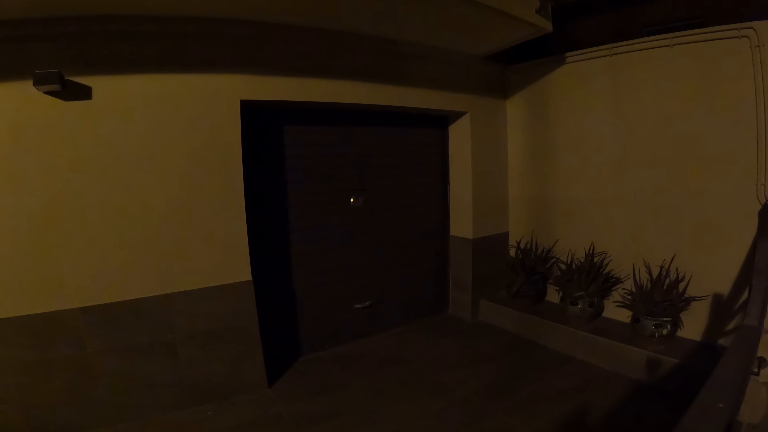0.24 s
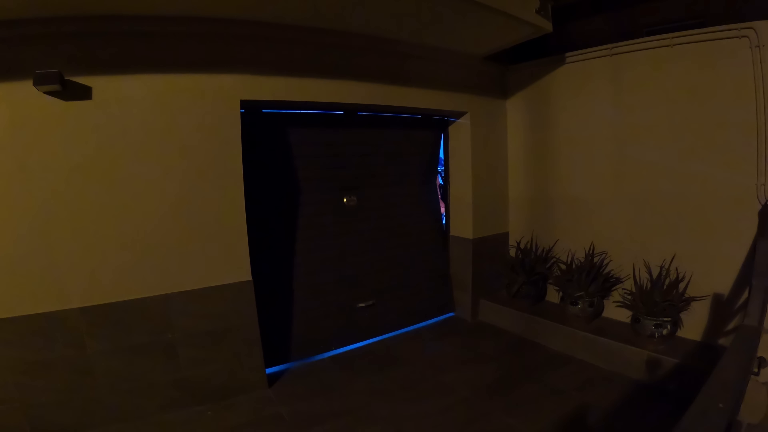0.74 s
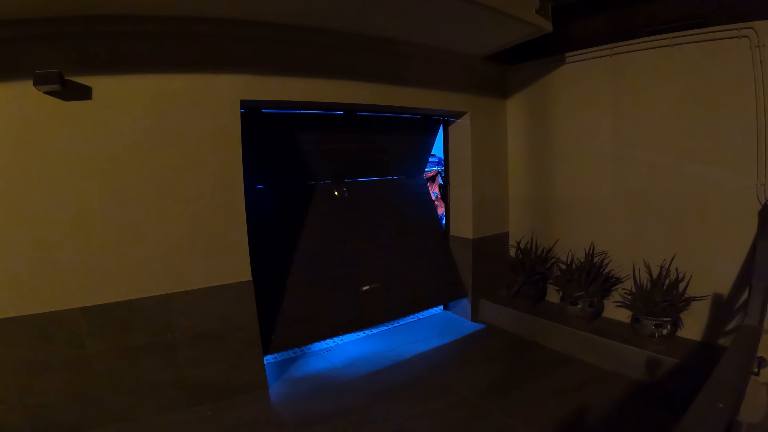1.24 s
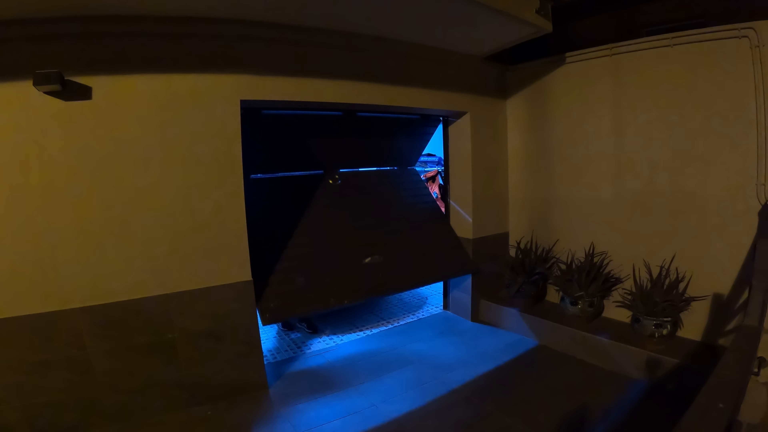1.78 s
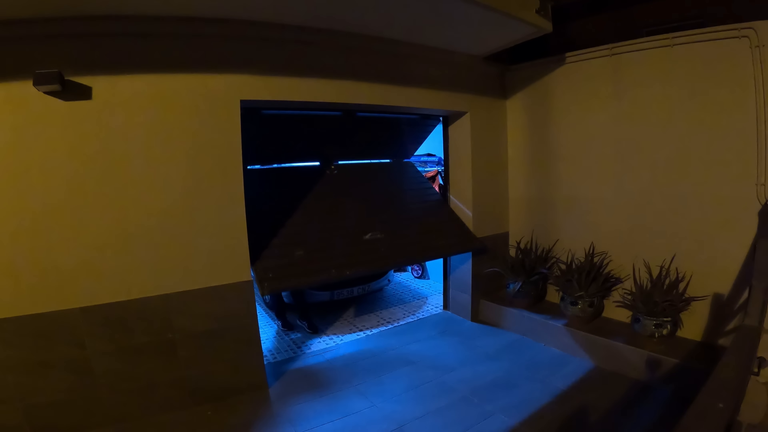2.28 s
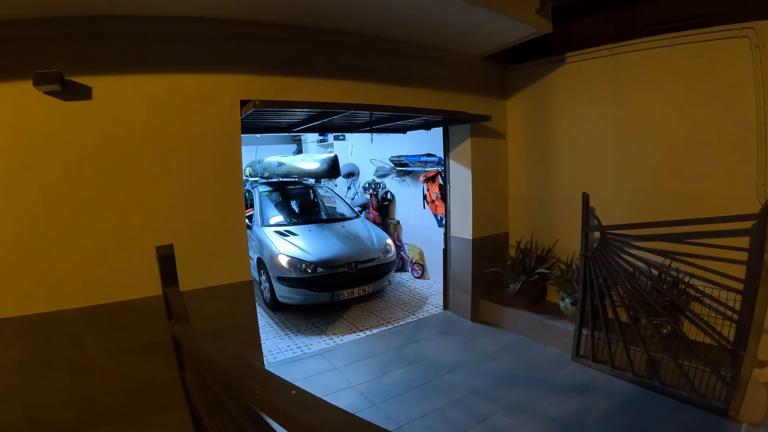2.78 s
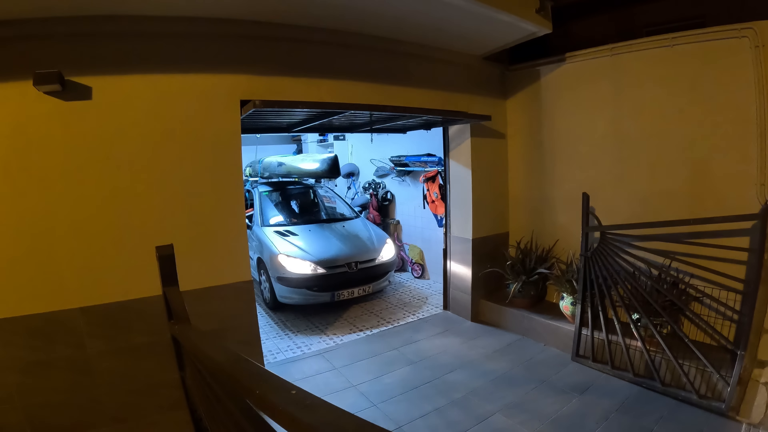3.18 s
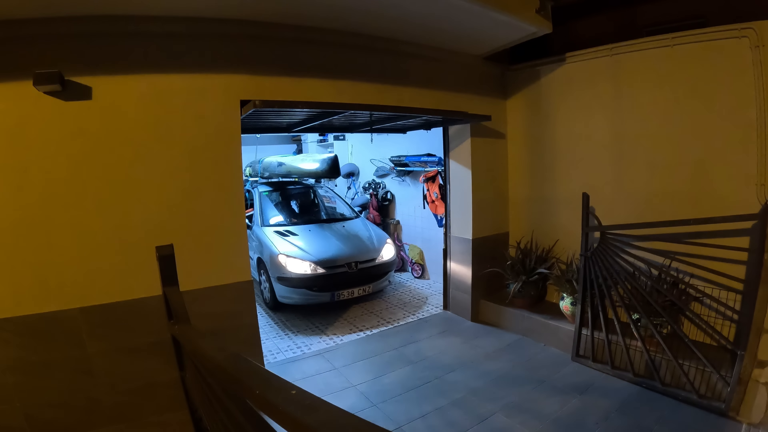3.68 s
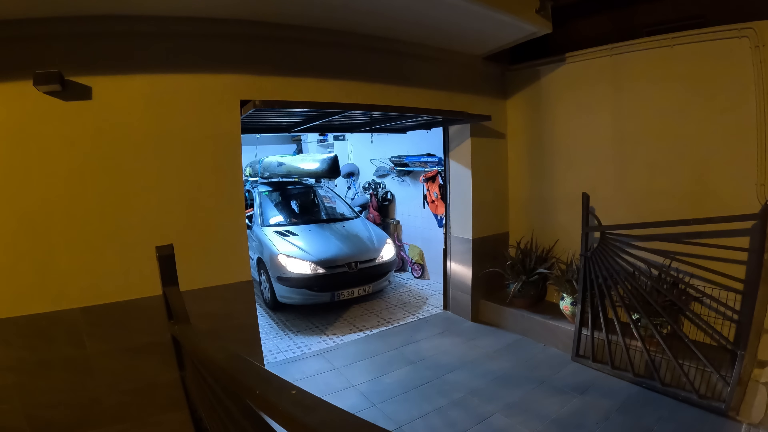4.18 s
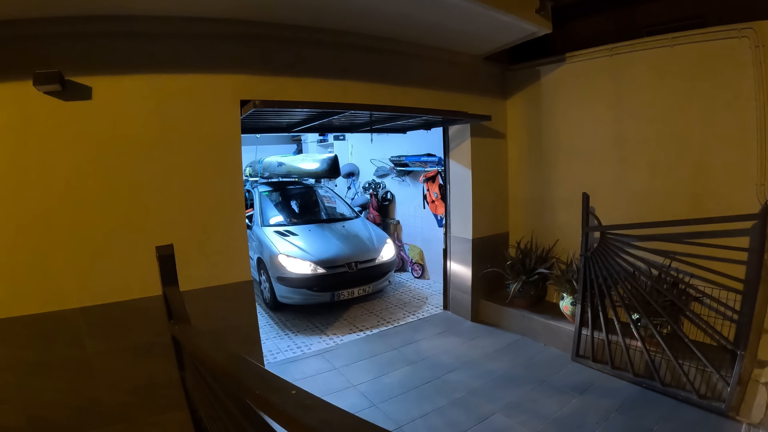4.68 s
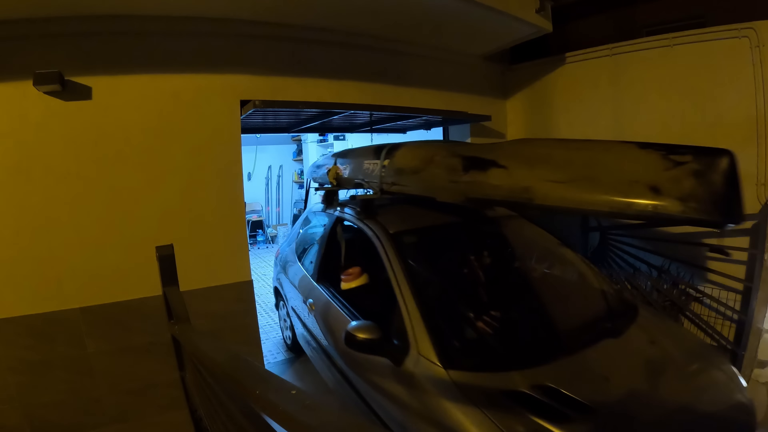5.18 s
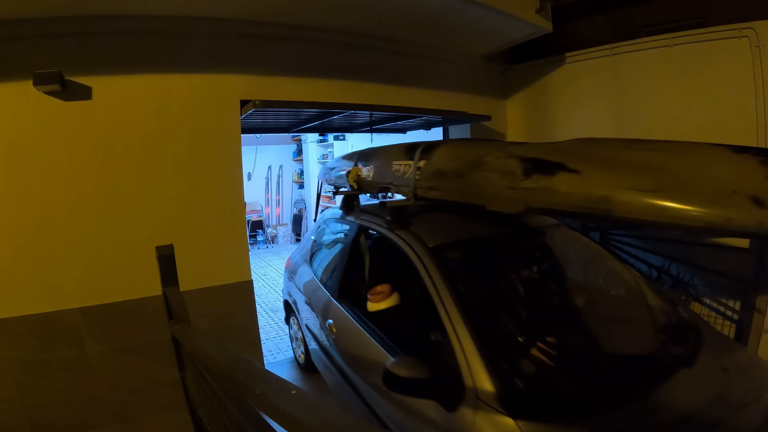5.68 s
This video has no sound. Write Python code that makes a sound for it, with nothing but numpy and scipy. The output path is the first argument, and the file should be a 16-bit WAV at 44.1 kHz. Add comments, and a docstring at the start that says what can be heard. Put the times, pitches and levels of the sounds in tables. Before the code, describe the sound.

From the start, a steel garage door is unlatched with quick clattering blows and a light scrape. Around 0.45 s it jolts free with a deep panel boom and shudder. More clanks follow, with a strong rattle at 0.95 s, a short piercing squeal near 1.06 s sliding into thinner squeaks until about 1.3 s, and the loudest bang at 1.4 s. Uneven rolling, knocks and a low drone continue, echoing off hard walls, until an abrupt cut at 2.78 s. Then a very quiet street: faint low town murmur and tiny rustles. At 3.65 s a starter slams in, grinding and whining, labouring near 4.0 and 4.17 s. The engine catches around 4.25 s, barks and flares at 4.35-4.5 s as the starter releases. From about 4.9 s the small four-cylinder car is closer and fuller, idling steadily with low throbbing, ticking, humming and occasional clacks to the end.

```python
"""A steel garage door clatters as it is unlatched and hauled up; its panels boom and its pivots squeal.
The door noise cuts off abruptly into a quiet night street. A small four-cylinder car is cranked in the garage,
catches, flares, then idles outside, close by. Bursts of noise make the blows and grinding, fading tones make
the ringing metal, gliding tones make the squeals, and a turning engine phase times every firing. Walls echo."""
import sys
import numpy as np
from scipy import signal
from scipy.fft import rfft, irfft, next_fast_len
from scipy.io import wavfile

SR = 44100
rng = np.random.default_rng(int(sys.argv[2]) if len(sys.argv) > 2 else 0)


def store_pcm(level_fs):
    """Save levels as 16-bit WAV."""
    pcm = np.round(np.clip(level_fs, -1, 1) * 32767).astype(np.int16)
    wavfile.write(sys.argv[1], SR, np.atleast_2d(pcm).T)


N = 261954
T = np.arange(N) / SR
PADDED = next_fast_len(N + SR)
FREQS = np.fft.rfftfreq(PADDED, 1 / SR)

# Levels are relative: spectra, echoes and mixing shape them further.
# t60_s is the time a ringing tone takes to fall by 60 dB; half_width_s is where a bump falls to 1/e.

# Door blows: start_s, level_db, brightness_db_per_octave
DOOR_BLOWS = [(0.017, -38.5, 3), (.038, -27.5, 0.5), (.084, -31, -0.5), (.163, -33, 1.5),
              (0.217, -32, -0.5), (0.456, -41, 1), (.486, -28, -0.5), (.592, -46, 2), (.642, -34.5, -3),
              (.728, -42, 2), (0.75, -45, 2), (0.798, -44.5, 4.5), (0.92, -37, 3.5), (0.948, -23, 2),
              (.994, -24.5, 5), (1.39, -38.5, 2), (1.408, -18, 2), (1.442, -27, 0), (1.503, -31, 4),
              (1.644, -43.5, 3.5), (1.772, -25.5, 1.5), (1.865, -40.5, 4), (1.981, -31.5, 3),
              (2.039, -31.5, -0.5), (2.122, -28, 2), (2.184, -29, 2), (2.264, -34, 1), (2.385, -40.5, -3.5),
              (2.482, -52.5, 2), (2.596, -34, -3), (2.714, -31.5, 0), (2.755, -39, 0.5)]
# Colour of the clattering door: frequency_hz, level_db
DOOR_COLOUR = [(88, -21), (150, -10.5), (337, -1.5), (401, 1), (772, -9), (1130, -4.5), (1910, -9),
               (2270, -12), (3400, -15), (4720, -21), (6550, -20), (7940, -34), (12100, -45.5),
               (15000, -67)]
# Ringing tones of the sheet steel: pitch_hz, level_db, t60_s
STEEL_TONES = [(398, -26.5, 0.16), (420, -25, 0.75), (530, -21, 0.93), (639, -16.5, 0.074), (800, -29, .3),
               (948, -21, 0.39), (1057, -29, 0.94), (1183, -15.5, 0.23), (1372, -14.5, 0.077),
               (1627, -24.5, 0.53), (2320, -23, 0.47), (3120, -30.5, 0.28), (4200, -20.5, .25),
               (4160, -17, .35)]
# Rollers in their tracks: time_s, level_db
ROLLING = [(.4, -62), (.5, -34.5), (.7, -52), (1.25, -43.5), (1.52, -38.5), (1.7, -44), (1.85, -34.5),
           (2.3, -39), (2.57, -45), (2.78, -39)]
# Colour of grit in the tracks: frequency_hz, level_db
TRACK_COLOUR = [(80, -10.5), (150, -2), (205, -6.5), (300, -4.5), (450, -6), (730, -10.5), (1080, -10.5),
                (1400, -11.5), (2640, -28.5), (3300, -24.5), (4400, -33), (6700, -30.5), (7600, -45.5),
                (14000, -60)]
# Colour of the shuddering leaf: frequency_hz, level_db
SHUDDER_COLOUR = [(15, -25), (40, 6), (70, -1), (120, -5), (170, -25.5), (400, -37), (2000, -76)]
# The folded leaf drones as it nears the top: time_s, level_db
DRONE_LEVELS = [(.4, -77), (1.7, -90), (2.2, -47.5), (2.55, -46), (2.78, -37.5)]
# Colour of that drone: frequency_hz, level_db
LEAF_COLOUR = [(110, -26), (150, 6), (172, -9.5), (215, -33.5), (400, -52.5), (2000, -81)]
# Pings of the bolt and lifting arms: start_s, pitch_hz, level_db, t60_s
METAL_PINGS = [(.185, 259.7, -31, 0.28), (.746, 5900, -37, 0.047), (0.748, 2580, -41.5, 0.0586),
               (.753, 4580, -36, 0.046), (.799, 1110, -33.5, 0.058), (1.512, 960, -23.5, 0.1)]
# Shoves that flex the panels: start_s, level_db, push_time_s
PANEL_SHOVES = [(.235, -26.5, 0.015), (.464, -5, 0.0107), (0.732, -18.5, 0.02), (1.451, -12, 0.03),
                (1.498, -15.5, 0.02), (1.641, -23, 0.0086), (1.798, -16.5, 0.033), (2.52, -25, .006),
                (2.6, -26.5, 0.013), (2.724, -28, 0.013)]
# Ringing tones of the panels: pitch_hz, level_db, t60_s
PANEL_TONES = [(41.73, 3.5, 0.62), (69.2, -12, 0.85), (92.9, 7.5, 0.2), (113.6, -6, 0.38),
               (179.2, -14, 0.8), (295.4, -9, 0.75), (350, -22.5, 0.68)]
# The door jolts in its frame: start_s, level_db
FRAME_JOLTS = [(.452, -30), (.495, -27.5), (.545, -29), (.985, -33)]
# Colour of the jolting frame: frequency_hz, level_db
FRAME_COLOUR = [(50, -11), (110, -2), (190, -5), (290, -3), (450, -9.5), (700, -21), (2000, -48.5),
                (8000, -68), (14000, -94.5)]
# Sharp knocks of the hinges: start_s, level_db
HINGE_HITS = [(.646, -38), (.8, -43), (.862, -43), (1.292, -37.5), (1.784, -29), (1.877, -44), (1.901, -53),
              (2.125, -32), (2.601, -37.5)]
# Colour of the hinges: frequency_hz, level_db
HINGE_COLOUR = [(150, -8), (450, 1), (800, 3), (1300, 2.5), (2700, -6.5), (7000, -20), (14000, -56.5)]
# Pivot squeals: start_s, length_s, first_pitch_hz, last_pitch_hz, level_db, roughness_0_to_1,
# overtones_db_per_octave
PIVOT_SQUEALS = [(.739, 0.016, 3444, 3472, -23.5, 0.17, 0.5), (.83, 0.015, 3500, 3460, -43, 0.15, -5),
                 (1.056, 0.015, 4500, 4435, -12, 0.1, -0.5), (1.07, 0.0071, 4234, 4070, -11, 0.8, -1),
                 (1.12, 0.056, 1783, 1804, -30.5, .08, 0.5), (1.192, 0.017, 1827, 1857, -34.5, 0.3, -3),
                 (1.229, 0.03, 1820, 1864, -35.5, 0.14, 0), (1.262, 0.03, 1854, 1792, -44, 0.05, -0.5)]
# Colour that the pivots give a squeal: frequency_hz, level_db
PIVOT_COLOUR = [(1800, 6.5), (3550, -1), (4500, -15.5), (5400, -8.5), (6950, -5.5), (7200, -28),
                (7700, -39), (9000, -26.5), (10500, -33), (14000, -49.5)]
# Colour of the far town: frequency_hz, level_db
NIGHT_COLOUR = [(15, -20), (25, 5.5), (33, -11), (38, -16.5), (76, -19), (113, -22.5), (160, -8),
                (293, -12.5), (511, -23), (846, -21.5), (1470, -19), (2710, -43), (6500, -42.5),
                (8240, -56.5), (14000, -61)]
# Borders of the murmur bands that waver separately: frequency_hz
MURMUR_BORDERS = [15, 200, 450, 900, 1400, 15000]
# Faint rustles in the quiet street: centre_s, level_db, half_width_s, centre_hz
STREET_RUSTLES = [(2.91, -72, 0.026, 6130), (3.02, -76.5, 0.021, 4200), (3.2, -82.5, 0.014, 2210),
                  (3.398, -73.5, .03, 5150), (3.454, -72, 0.051, 3600), (3.608, -73.5, 0.11, 4500)]
# Colour of a rustle: multiple_of_its_centre, level_db
RUSTLE_COLOUR = [(.25, -16), (.7, -8), (1, 5.5), (1.5, -5.5), (3, -26.5)]
# Colour of the starter's gears: frequency_hz, level_db
GEAR_COLOUR = [(1060, -45), (1800, -1), (2480, -2), (3000, -1), (3800, 0), (4800, -3), (6570, 2),
               (7310, -12.5), (10700, -20.5), (13800, -37), (15000, -51)]
# Colour of the engine block under the starter: frequency_hz, level_db
BLOCK_COLOUR = [(88, -19), (150, -13), (210, -13.5), (257, -14), (334, -10), (439, -11), (489, -5),
                (779, -13), (989, -2), (2600, -18), (3380, -50), (5720, -120)]
# Compression strokes that load the starter: centre_s, half_width_s, load_0_to_1, groan_level_db,
# first_pitch_hz, last_pitch_hz
COMPRESSIONS = [(3.993, 0.043, 0.88, -29.5, 342.4, 240.6), (4.165, 0.031, 0.79, -36, 301, 233.5)]
# Starter sounds in each state: turning_freely_db, first_slam_db, under_load_db, overrun_db
GEAR_RASP = (-37, -19.5, -35.5, -30)
BLOCK_RUMBLE = (-40, -22, -31.5, -37)
GEAR_WHINE = (-50, -38.5, -57, -45.5)
# The toothed flywheel rings under the pinion: pitch_hz, level_db
FLYWHEEL_TONES = [(904, -10.5), (1125, -7), (3784, -6), (4750, -4.5), (5170, -6.5), (5640, -5), (5825, -10),
                  (6100, -8), (6342, -23), (6480, -5), (6696, -0.5)]
# The pinion bangs on the flywheel: start_s, level_db
PINION_BANGS = [(3.69, -26.5), (4.132, -36)]
# Colour of those bangs in the housing: frequency_hz, level_db
HOUSING_COLOUR = [(100, -17), (165, -2.5), (220, -7.5), (377, -1.5), (480, -9), (850, -7.5), (996, 3),
                  (1110, -13), (1240, 2.5), (1400, -9), (1600, -3.5), (2200, -14.5), (12000, -53.5)]
# Engine speed before small unsteadiness: time_s, firing_rate_hz
ENGINE_SPEED = [(3.7, 10.3), (4.25, 25.3), (4.32, 35.4), (4.44, 37.7), (4.59, 31.6), (4.72, 28.7),
                (4.88, 30.1), (5.03, 27.5), (5.94, 27.5)]
# Colour of the exhaust pulses: frequency_hz, level_db
EXHAUST_COLOUR = [(8, -13), (27, 2.5), (54, -6.5), (81, -6), (108, -28), (136, -14), (165, -23),
                  (2000, -83)]
# Colour of the engine rocking on its mounts: frequency_hz, level_db
LURCH_COLOUR = [(10, 5), (22, 4), (38, 6.5), (68, -7), (100, -34), (250, -17.5), (2000, -102)]
# Surges that rock the engine: centre_s, level_db, half_width_s
ENGINE_SURGES = [(3.845, -35, 0.013), (4.326, -25.5, 0.032), (4.531, -19, 0.052), (4.67, -30, 0.049),
                 (4.87, -36, 0.073)]
# Humming tones of the shaken block: multiple_of_firing_rate, level_db
HUM_TONES = [(6, -1), (7, 0), (8, 8), (9, 8.5), (10, 5.5), (11, -2), (12, 6.5), (14, 8), (16, 2),
             (17, 10.5), (19, 5), (21, 0), (24, 7)]
# Colour of the engine bay: frequency_hz, level_db
BAY_COLOUR = [(65, -48), (110, -13), (138, -8), (166, -9.5), (327, -5), (455, -7), (760, -9.5), (1920, -12),
              (2780, -22), (4020, -22), (4840, -28.5), (6450, -23), (7300, -39.5), (10600, -46),
              (15000, -71)]
# Unequal knocks of the four cylinders: level_db
CYLINDER_LEVELS = (1, -3, 2.5, -1)
# Colour of the knocked crankcase: frequency_hz, level_db
CRANKCASE_COLOUR = [(70, -24), (130, -9), (200, -4.5), (300, -2), (400, -4), (520, -7.5), (660, -8.5),
                    (900, -16), (2200, -17.5), (4000, -45), (12000, -75)]
# The air box hums as the engine draws in air, and last the clutch or brake moans: centre_s, half_width_s,
# pitch_hz, level_db
SHORT_MOANS = [(4.15, 0.021, 172, -39.5), (4.3, .035, 268, -35.5), (4.5, .06, 264, -42),
               (4.67, .05, 270, -35.5), (4.97, 0.021, 454.5, -37)]
# First ignitions: start_s, level_db, brightness_db_per_octave
FIRST_IGNITIONS = [(4.359, -17.5, -0.5), (4.382, -21, 1), (4.409, -20.5, -0.5), (4.423, -37, -3),
                   (4.454, -32, -0.5), (4.486, -35, -0.5)]
# Colour of ignition barks and intake roar: frequency_hz, level_db
BARK_COLOUR = [(40, 1), (70, 2), (120, -4), (190, -6.5), (260, 0.5), (400, 2), (520, -3.5), (700, -13),
               (1500, -15.5), (4000, -40), (12000, -62)]
# Loudest clacks in the idling engine: start_s, level_db
ENGINE_CLACKS = [(5.074, -32), (5.182, -34.5), (5.223, -35), (5.328, -33), (5.409, -39), (5.773, -45)]
# Colour of the clacks: frequency_hz, level_db
CLACK_COLOUR = [(200, -4), (600, 6), (1100, 7), (2200, 4), (3200, -22), (6600, -34), (12000, -52)]
# Echoes from the sides: frequency_hz, side_level_db
SIDE_ECHOES = [(60, -42.5), (150, -25.5), (300, -19.5), (600, -10), (1400, -6), (2800, -2.5), (5500, -9.5),
               (9000, -24.5), (13000, -0.5)]
# Fading time of the wall echoes: frequency_hz, t60_s
WALL_FADING = [(250, 0.81), (1200, 0.62), (4000, 0.51), (10000, 0.36)]
# Colour difference of the microphone ports: frequency_hz, left_minus_right_db
PORT_COLOUR = [(100, 0.15), (500, -0.65), (1100, -0.7), (4000, -1), (8000, 1.3)]

CHATTER_S, TIGHTEN_PER_DB = .026, .025  # fade time of a middling blow; harder blows are over sooner
LATCH_S, LATCH_HALF_WIDTH_S, LATCH_DB = 0.17, 0.11, -41.5  # the bolt scrapes back
# The leaf shudders once it is free of its frame
FREE_S, SHUDDER_RISE_S, SHUDDER_DB, SHUDDER_FALL_DB_PER_S = .45, 0.077, -30, 8
ROLL_SHUDDER_DB = -4  # shudder fed by the rolling itself, relative to the rolling level
PANEL_BUILD_S = .022  # swing-up time constant of the big sheets
SQUEAL_ATTACK_S, SQUEAL_RELEASE_SHARE = 0.011, 0.65  # release time constant as a share of the length
DOOR_CUT_S = 2.782
NIGHT_DB = -57.5
STARTER_ON_S, STARTER_ATTACK_S, STARTER_OFF_S, STARTER_RELEASE_S = 3.655, 0.03, 4.503, 0.036
MESH_HZ, SPIN_UP_S, INRUSH_S = 438, .03, 0.036  # free-cranking gear mesh; spin-up and first-slam time constants
OVERRUN_S, OVERRUN_RISE_S, OVERRUN_SHARE = 4.078, 0.42, 0.0562  # the engine spins the pinion faster
SAG_SHARE = 0.0155  # share of cranking speed lost at full load
FREEWHEEL_DB, FREEWHEEL_TILT_DB = -31, 4.5  # overrun clutch hiss, brighter than the gears (dB, dB per octave)
GROAN_LAG_S, GROAN_ROUGH = 0.005, 0.0694  # the groan peaks just after each stroke; share of pitch scatter
FLYWHEEL_T60_S, FLYWHEEL_DB = 0.089, -19
# The engine catches, then its strokes even out
CATCH_S, CATCH_RISE_S, SETTLE_S, IDLE_UNEVEN = 4.25, 0.017, .2, 0.251
CRANK_DB, THROB_DB, BAY_DB = -38.5, -32, -34  # exhaust while cranked, running exhaust, engine bay
OUTSIDE_S, OUTSIDE_RISE_S = 4.87, 0.03  # the car is out of the garage from here on
INSIDE_DB, INSIDE_TILT_DB = -5, 3  # before that, its bay is fainter and its rattle thinner (dB, dB per octave)
ROAR_S, ROAR_RISE_S, ROAR_DECAY_S, ROAR_DB = 4.35, 0.032, 0.1, -25  # the intake roars as the engine flares
TOP_HZ = 14900


def amp(db):
    """Turn decibels into gain."""
    return 10 ** (np.asarray(db) / 20)


def unit(x):
    """Scale to an average power of 1."""
    return x / np.sqrt(np.mean(x ** 2))


def curves(rows):
    """Draw each column of a table as a line through time."""
    s, *columns = np.transpose(rows)
    return [np.interp(T, s, column) for column in columns]


def on_log_axis(hz, points):
    """Read frequency and value points at any frequency."""
    f, value = np.transpose(points)
    return np.interp(np.log(np.maximum(hz, 1)), np.log(f), value)


def convolve(x, response):
    """Let every sample of x set off the same response."""
    return signal.fftconvolve(x, response)[:len(x)]


def colour(x, points, tilt_db=0, size=4096):
    """Filter with the given spectrum, tilted per octave, without sounding ahead of the input."""
    hz = np.fft.rfftfreq(size, 1 / SR)
    gain = amp(on_log_axis(hz, points) + tilt_db * np.log2(np.maximum(hz, 1)))
    # fold the log spectrum forward in time so the response starts at once
    cepstrum = irfft(np.log(gain))
    cepstrum[1:size // 2] *= 2
    cepstrum[size // 2 + 1:] = 0
    response = irfft(np.exp(rfft(cepstrum)))
    return convolve(x, response / np.linalg.norm(response))


def grains(rate, spread_db, size=N):
    """Make random tiny contacts of uneven strength, with rate per second."""
    hit = rng.random(size) < rate / SR
    sign = rng.choice([-1, 1], size)
    strength = amp(spread_db * np.clip(rng.standard_normal(size), -2, 2))
    return unit(hit * sign * strength)


def walk(rate):
    """Wander between random values, with rate new values per second."""
    knots = rng.standard_normal(20000)
    return np.interp(T * rate, np.arange(len(knots)), knots)


def ring(hz, t60):
    """Make one second of a tone that dies away."""
    return np.sin(2 * np.pi * hz * T[:SR]) * np.exp(-np.log(1000) * T[:SR] / t60)


def add(out, s, sound):
    """Mix a sound in at time s."""
    i = max(int(s * SR), 0)
    out[i:i + len(sound)] += sound[:N - i]


def ramp(s, rise_s):
    """Rise from 0 at time s to 1 after rise_s."""
    return np.clip((T - s) / rise_s, 0, 1)


def fade(s, decay_s):
    """Hold 1 until time s, then die away."""
    return np.exp(-np.maximum(T - s, 0) / decay_s)


def swell(s, half_width_s):
    """Make a smooth bump of height 1 around time s."""
    return np.exp(-((T - s) / half_width_s) ** 2)


def knocks(rows, spectrum, decay_s, tilt_db=0):
    """Hard parts strike: each blow is a short burst of dying noise of one colour."""
    out = np.zeros(N)
    for s, db in rows:
        burst = rng.standard_normal(SR) * np.exp(-T[:SR] / decay_s)
        knock = colour(burst, spectrum, tilt_db)
        add(out, s, amp(db) * unit(knock) * np.sqrt(decay_s))
    return out


def ringing(tones):
    """Add up ringing tones, given as pitch, level and t60, into one response."""
    return sum(amp(db) * unit(ring(hz, t60)) for hz, db, t60 in tones) / np.sqrt(SR)


def echo_tail(build_s=0.0046):
    """Walls scatter sound into a dense tail; the treble dies first and deep bass escapes."""
    noise = rng.standard_normal(SR)
    hz, s, cells = signal.stft(noise, SR, nperseg=256)
    cells = cells * np.exp(-np.log(1000) * s / on_log_axis(hz, WALL_FADING)[:, None])
    tail = signal.istft(cells, SR)[1][:SR] * (1 - np.exp(-T[:SR] / build_s))
    tail = signal.sosfilt(signal.butter(2, 130, "high", fs=SR, output="sos"), tail)
    return tail / np.linalg.norm(tail)


def wall_echoes(x, wet_db):
    """Direct sound meets wall echoes; a separate echo from the sides makes the width."""
    wet = amp(wet_db)
    mid = (x + wet * convolve(x, echo_tail())) / np.hypot(1, wet)
    side_gain = amp(on_log_axis(FREQS, SIDE_ECHOES) - 6.0)
    side = irfft(rfft(convolve(x, echo_tail()), PADDED) * side_gain, PADDED)[:N]
    return np.array([mid + side, mid - side])


def rollers():
    """The bolt scrapes and rollers rub over grit and track joints; the whole leaf shudders and drones."""
    roll_db, = curves(ROLLING)
    drone_db, = curves(DRONE_LEVELS)
    rubbing = amp(roll_db) + amp(LATCH_DB) * swell(LATCH_S, LATCH_HALF_WIDTH_S)
    shaken_db = SHUDDER_DB - SHUDDER_FALL_DB_PER_S * (T - FREE_S - SHUDDER_RISE_S)
    shaken = ramp(FREE_S, SHUDDER_RISE_S) * amp(shaken_db)
    grit = colour(grains(rate=1300, spread_db=1.5), TRACK_COLOUR) * rubbing * amp(2.3 * walk(24.74))
    shaking = np.hypot(shaken, amp(ROLL_SHUDDER_DB) * amp(roll_db))
    shudder = colour(rng.standard_normal(N), SHUDDER_COLOUR) * shaking
    drone = colour(rng.standard_normal(N), LEAF_COLOUR) * amp(drone_db)
    return grit + shudder + drone


def clatter(rise_share=.32):
    """Each blow is a swelling, then dying burst of contacts between loose steel parts."""
    out, t = np.zeros(N), T[:SR // 2]
    middling_db = np.mean([db for _, db, _ in DOOR_BLOWS])
    for s, db, bright_db in DOOR_BLOWS:
        chatter_s = CHATTER_S * np.exp(-TIGHTEN_PER_DB * max(db - middling_db, 0))
        burst = np.exp(-t / chatter_s) * (1 - np.exp(-t / (rise_share * chatter_s)))
        contacts = unit(grains(rate=5000, spread_db=2.5, size=len(t)) * burst)
        contacts = contacts * np.sqrt(chatter_s)  # longer chatter, more energy
        # start a little early, as the burst needs time to swell
        add(out, s - rise_share * chatter_s / 2, amp(db) * colour(contacts, DOOR_COLOUR, bright_db))
    return out


def sheets(x, steel_db=-17):
    """The clatter, rolling and hinge knocks passed in also set the steel sheets ringing."""
    return x + amp(steel_db) * convolve(x, ringing(STEEL_TONES))


def pings():
    """The bolt and steel arms ring briefly as they snap into line."""
    out = np.zeros(N)
    for s, hz, db, t60 in METAL_PINGS:
        add(out, s, amp(db) * ring(hz, t60))
    return out


def boom():
    """Shoves flex the big panels; each drives most the tones whose period matches its push time."""
    out = np.zeros(N)
    for s, db, push_s in PANEL_SHOVES:
        swing = np.zeros(SR)
        for hz, tone_db, t60 in PANEL_TONES:
            match = 1 / ((hz * push_s) ** 2 + (hz * push_s) ** -2)
            swing += amp(tone_db) * ring(hz, t60) * match
        add(out, s, amp(db) * swing * (1 - np.exp(-T[:SR] / PANEL_BUILD_S)))
    return out


def squeals(waver=0.0052, slip=0.061, overtone_growth=0.81, count=5):
    """Dry pivots stick and slip unevenly as pitch glides; harder rubbing brings out the overtones."""
    out = np.zeros(N)
    for s, length_s, first_hz, last_hz, level_db, rough, bright_db in PIVOT_SQUEALS:
        attack = ramp(s - SQUEAL_ATTACK_S, SQUEAL_ATTACK_S)
        rub = attack * fade(s + length_s, SQUEAL_RELEASE_SHARE * length_s)
        on = rub > amp(-60)
        glide = first_hz + (last_hz - first_hz) * ramp(s, length_s)
        hz = (glide * (1 + waver * walk(180) + slip * rough * walk(1200)))[on]
        db = level_db + 20 * np.log10(rub[on]) + .9 * walk(70)[on]
        phase = 2 * np.pi * np.cumsum(hz) / SR
        for k in range(1, count + 1):
            overtone_db = np.log2(k) * (bright_db + overtone_growth * (db - db.max()))
            gain = amp(db - 1.0 + overtone_db + on_log_axis(k * hz, PIVOT_COLOUR))
            out[on] += gain * np.sin(k * phase) * (k * hz < TOP_HZ)
    return out


def night(waver_db=3.0):
    """The far town murmurs in bands that waver separately; bursts of tiny contacts make faint rustles."""
    murmur = rfft(colour(rng.standard_normal(N), NIGHT_COLOUR), PADDED)
    out = np.zeros(N)
    for low, high in zip(MURMUR_BORDERS, MURMUR_BORDERS[1:]):
        band = irfft(murmur * (FREQS >= low) * (FREQS < high), PADDED)[:N]
        out += band * amp(NIGHT_DB + waver_db * walk(9.8))
    for s, db, half_width_s, centre_hz in STREET_RUSTLES:
        spectrum = [(multiple * centre_hz, level_db) for multiple, level_db in RUSTLE_COLOUR]
        rustle = colour(grains(rate=4200, spread_db=4.0), spectrum)
        out += amp(db) * swell(s, half_width_s) * rustle
    return out


def groans(octave_db=-10):
    """The starter motor labours against each compression, sinking unsteadily in pitch."""
    out = np.zeros(N)
    for s, half_width_s, _, db, first_hz, last_hz in COMPRESSIONS:
        hz = first_hz + (last_hz - first_hz) * ramp(s - half_width_s, 1.32 * half_width_s)
        phase = 2 * np.pi * np.cumsum(hz * (1 + GROAN_ROUGH * walk(300))) / SR
        tone = np.sin(phase) + amp(octave_db) * np.sin(2 * phase)
        out += amp(db + 1.8 * walk(110)) * swell(s + GROAN_LAG_S, half_width_s) * tone
    return out


def flywheel(x):
    """Grinding teeth set the flywheel ringing."""
    tones = [(hz, db, FLYWHEEL_T60_S) for hz, db in FLYWHEEL_TONES]
    return x + amp(FLYWHEEL_DB) * convolve(x, ringing(tones))


def starter(mesh_depth=0.18):
    """The pinion slams in, groans through the compression strokes and is overrun as the engine catches."""
    load = sum(force * swell(s, half_width_s) for s, half_width_s, force, *_ in COMPRESSIONS)
    overrun = ramp(OVERRUN_S, OVERRUN_RISE_S)
    hz = MESH_HZ * (1 - fade(STARTER_ON_S, SPIN_UP_S))
    hz = hz * (1 - SAG_SHARE * load) * (1 + OVERRUN_SHARE * overrun ** 4)
    slam = fade(STARTER_ON_S + STARTER_ATTACK_S / 4, INRUSH_S)
    states = (1, slam, load, overrun)

    def state_gain(levels):
        """Blend the powers of the four starter states."""
        return np.sqrt(sum((amp(db) * state) ** 2 for db, state in zip(levels, states)))

    whine_gain = state_gain(GEAR_WHINE)
    phase = 2 * np.pi * np.cumsum(hz * (1 + 0.0185 * walk(120))) / SR
    teeth = 1 + mesh_depth * np.cos(phase)
    whine = unit(np.sin(phase) + amp(-10) * np.sin(2 * phase) + amp(-13) * np.sin(4 * phase))
    rasp = colour(unit(grains(rate=7400, spread_db=-3.5) * teeth) * state_gain(GEAR_RASP), GEAR_COLOUR)
    block = colour(unit(grains(rate=2500, spread_db=4.5) * teeth) * state_gain(BLOCK_RUMBLE), BLOCK_COLOUR)
    hiss = colour(grains(rate=6700, spread_db=9) * teeth, GEAR_COLOUR, FREEWHEEL_TILT_DB)
    freewheel = hiss * amp(FREEWHEEL_DB) * overrun ** 1.65
    engaged = ramp(STARTER_ON_S, STARTER_ATTACK_S) ** 2 * fade(STARTER_OFF_S, STARTER_RELEASE_S)
    return (whine * whine_gain + groans() + flywheel(rasp + block + freewheel)) * engaged


def engine(pulse_depth=0.18, hum_db=-7, tick_db=-7, wash_db=-3, tick_turns=0.6, knock_db=-6,
           knock_turns=0.21):
    """Firings pump the exhaust, shake the block and rattle the valve gear; returns (exhaust, engine bay)."""
    hz, = curves(ENGINE_SPEED)
    running, outside = ramp(CATCH_S, CATCH_RISE_S), ramp(OUTSIDE_S, OUTSIDE_RISE_S)
    uneven = IDLE_UNEVEN + (1 - IDLE_UNEVEN) * fade(STARTER_OFF_S, SETTLE_S)
    uneven = np.clip(uneven, 0, 1)
    # one turn here is one firing
    turns = np.cumsum(hz * (1 + .05 * uneven * walk(20) + .04 * walk(60))) / SR
    phase = 2 * np.pi * turns

    firings = np.diff(np.floor(turns), prepend=0) * amp(1.9 * rng.standard_normal(N))
    pulses = colour(firings - hz / SR, EXHAUST_COLOUR, size=16384) * np.sqrt(SR / hz)
    # lurching outweighs the regular pulses until the idle settles
    lurch = colour(rng.standard_normal(N), LURCH_COLOUR)
    throb = np.sqrt(1 - uneven ** 2) * pulses + uneven * lurch
    effort = amp(CRANK_DB) * (1 - running) + amp(THROB_DB) * running
    effort = effort + sum(amp(db) * swell(s, half_width_s) for s, db, half_width_s in ENGINE_SURGES)
    exhaust = throb * effort * amp(2 * uneven * walk(22))

    hum = np.zeros(N)
    for k, db in HUM_TONES:
        tone = np.cos(k * phase + 2 * np.pi * rng.random() + 0.56 * walk(12))
        hum += amp(db + 1.8 * walk(9)) * tone
    hum = amp(hum_db) * unit(hum)
    wash = unit(rng.standard_normal(N) * (1 + pulse_depth * np.cos(phase)) * amp(walk(70)))
    # two valves seat for each firing, each with its own force
    seatings = 2 * turns
    force = amp(2.7 * np.clip(rng.standard_normal(N // 100), -2, 1))[seatings.astype(int)]
    ticks = unit(rng.standard_normal(N) * force * np.exp(-(seatings % 1) / tick_turns))
    rattle = amp(wash_db) * wash + amp(tick_db) * ticks

    # each combustion knocks the crankcase half a firing before its exhaust pulse arrives
    knock_turn = turns + .5
    stroke = knock_turn.astype(int)
    cylinder_db = np.array(CYLINDER_LEVELS)[stroke % len(CYLINDER_LEVELS)]
    blow = amp(cylinder_db + 2.0 * rng.standard_normal(N // 100)[stroke])
    knock = unit(rng.standard_normal(N) * blow * np.exp(-(knock_turn % 1) / knock_turns))
    body = hum + amp(knock_db) * colour(knock, CRANKCASE_COLOUR)
    outside_bay = body + colour(rattle, BAY_COLOUR)
    inside_bay = amp(INSIDE_DB) * (body + colour(rattle, BAY_COLOUR, INSIDE_TILT_DB))
    bay = outside * outside_bay + (1 - outside) * inside_bay
    return exhaust * ramp(STARTER_ON_S, SPIN_UP_S), bay * amp(BAY_DB) * running


def moans(waver=0.0306):
    """Air drawn through the intake makes short, wavering hums; the clutch or brake moans once."""
    out = np.zeros(N)
    for s, half_width_s, hz, db in SHORT_MOANS:
        phase = 2 * np.pi * np.cumsum(hz * (1 + waver * walk(120))) / SR
        out += amp(db + 1.9 * walk(60)) * swell(s, half_width_s) * np.sin(phase)
    return out


def flare(chug_depth=0.27):
    """The first ignitions bark, short hums waver, and roaring air swells once a firing."""
    hz, = curves(ENGINE_SPEED)
    gulps = rng.standard_normal(N) * (1 + chug_depth * np.cos(2 * np.pi * np.cumsum(hz) / SR))
    roar_level = amp(ROAR_DB) * ramp(ROAR_S, ROAR_RISE_S) * fade(ROAR_S, ROAR_DECAY_S)
    roar = colour(gulps, BARK_COLOUR) * roar_level
    barks = sum(knocks([(s, db)], BARK_COLOUR, decay_s=0.0077, tilt_db=bright_db)
                for s, db, bright_db in FIRST_IGNITIONS)
    return roar + moans() + barks


def scene():
    """Mix the door, its abrupt cut, the quiet street, the engine start and the idle."""
    hinges = knocks(HINGE_HITS, HINGE_COLOUR, decay_s=0.0061)
    jolts = knocks(FRAME_JOLTS, FRAME_COLOUR, decay_s=0.03)
    door = wall_echoes(sheets(rollers() + clatter() + hinges), wet_db=-5.0)
    door = door + wall_echoes(pings() + squeals(), wet_db=-6.5)
    door = door + wall_echoes(boom() + jolts, wet_db=-4.0)
    door_heard = np.clip((DOOR_CUT_S - T) / 0.002, 0, 1)  # the echoes are cut too
    street = wall_echoes(night(), wet_db=-13.5)
    bangs = knocks(PINION_BANGS, HOUSING_COLOUR, decay_s=.06)
    start = wall_echoes(starter() + bangs + flare(), wet_db=-7.0)
    exhaust, bay = engine()
    clacks = knocks(ENGINE_CLACKS, CLACK_COLOUR, decay_s=0.011)
    idle = wall_echoes(bay + clacks, wet_db=-10.0) + exhaust
    return door * door_heard + street + start + idle


def record(dry, lag_s=1.2e-5):
    """Two microphone ports differ slightly in colour, the left is reached a little later; the top is cut."""
    half_db = on_log_axis(FREQS, PORT_COLOUR) / 2
    left = amp(half_db) * np.exp(-2j * np.pi * FREQS * lag_s)
    right = amp(-half_db)
    heard = irfft(rfft(dry, PADDED) * np.array([left, right]), PADDED)[:, :N]
    return signal.sosfilt(signal.ellip(8, .2, 80, TOP_HZ, fs=SR, output="sos"), heard)


dry = scene()
out = record(dry)
store_pcm(out)
```